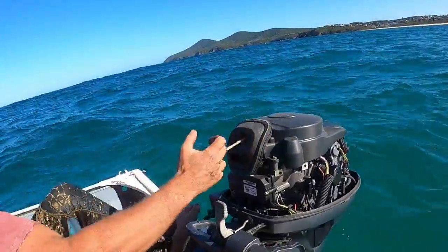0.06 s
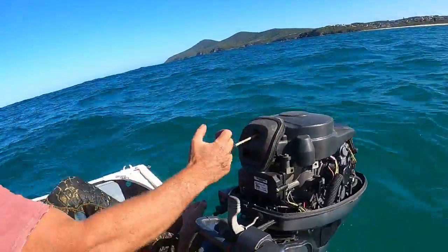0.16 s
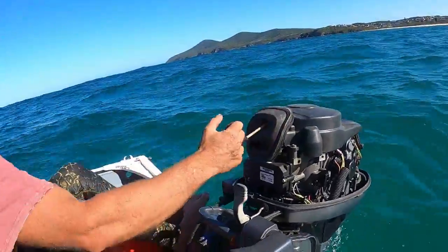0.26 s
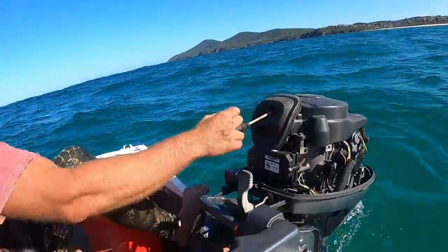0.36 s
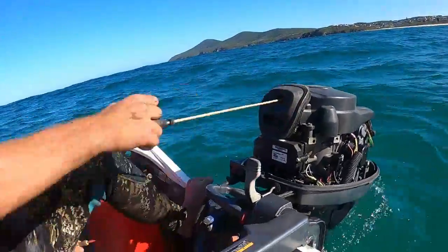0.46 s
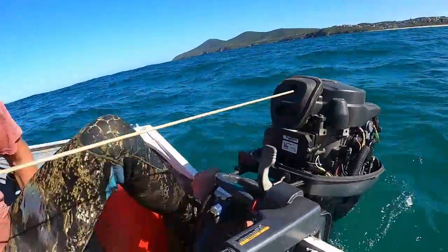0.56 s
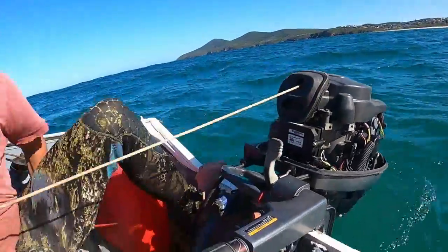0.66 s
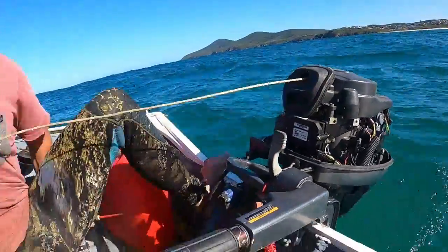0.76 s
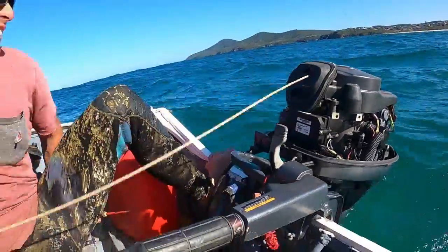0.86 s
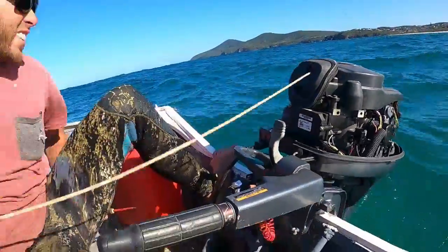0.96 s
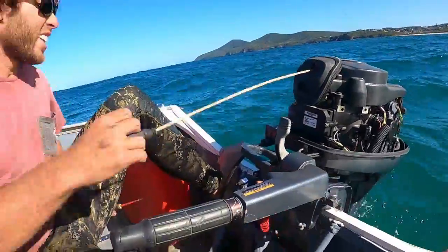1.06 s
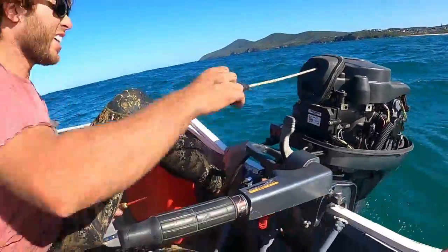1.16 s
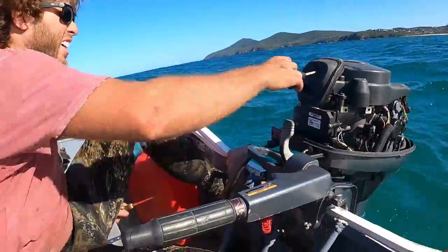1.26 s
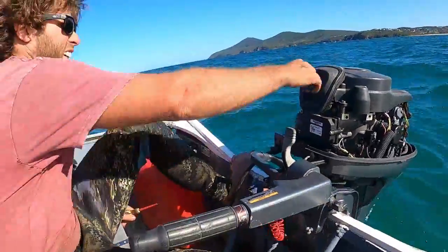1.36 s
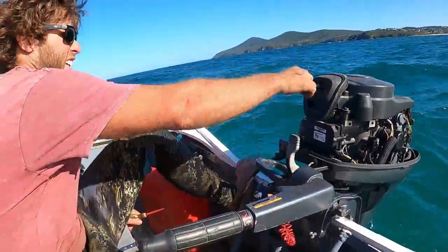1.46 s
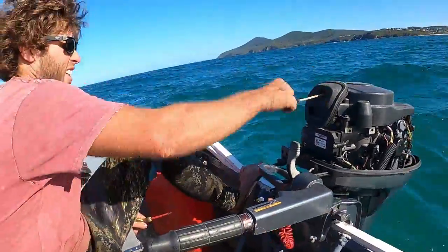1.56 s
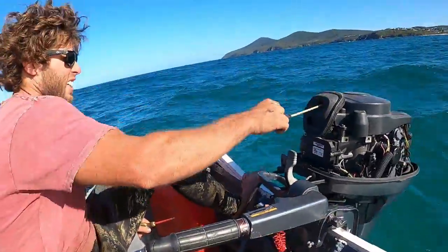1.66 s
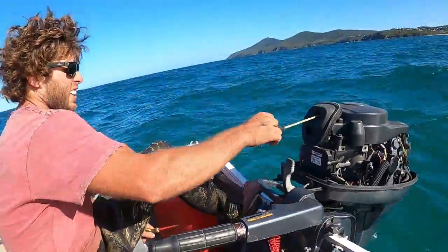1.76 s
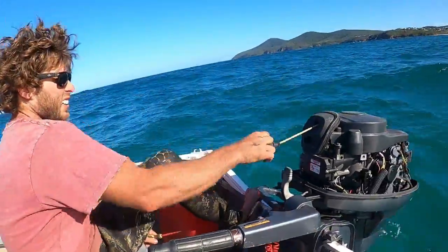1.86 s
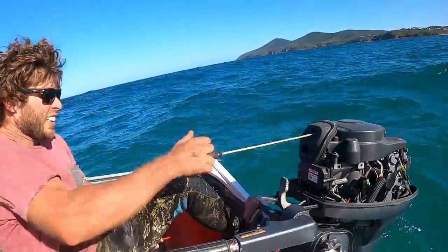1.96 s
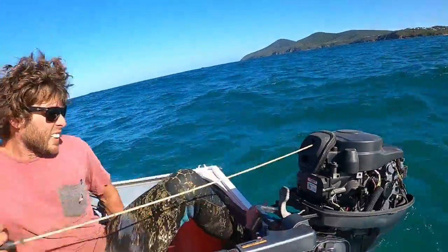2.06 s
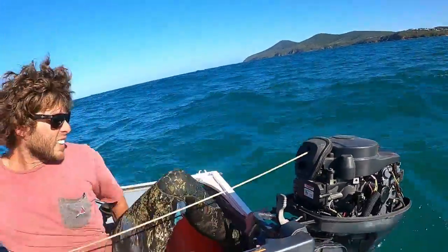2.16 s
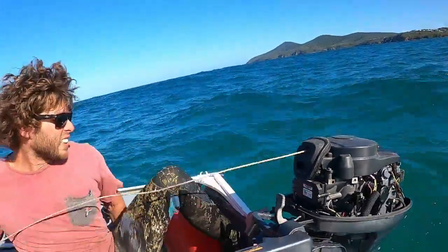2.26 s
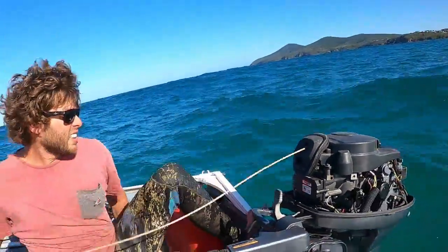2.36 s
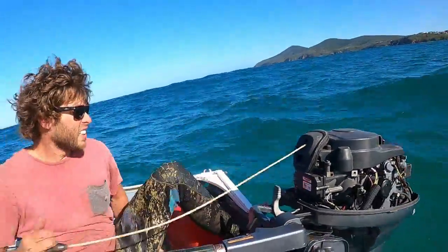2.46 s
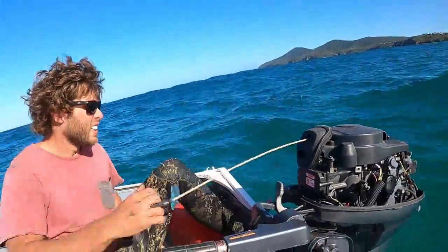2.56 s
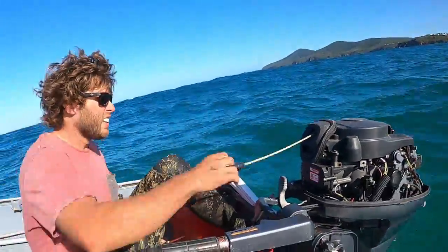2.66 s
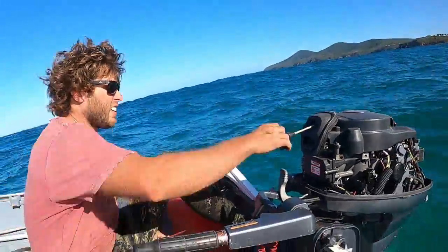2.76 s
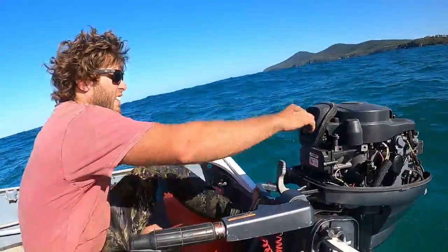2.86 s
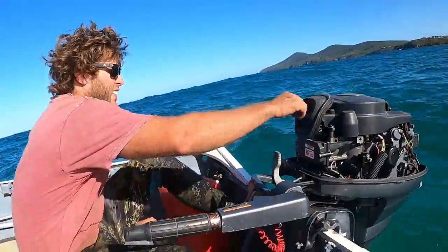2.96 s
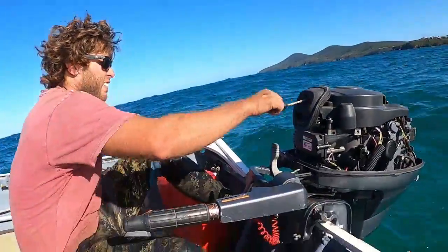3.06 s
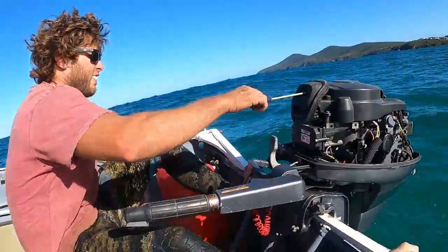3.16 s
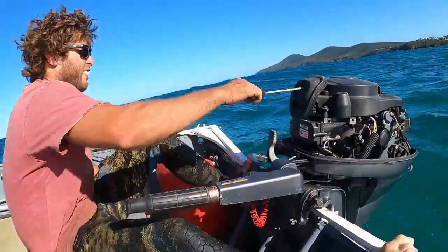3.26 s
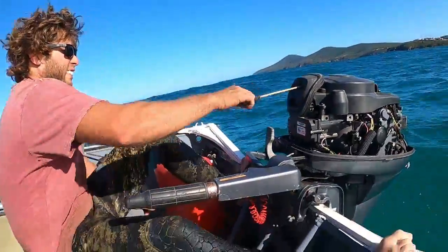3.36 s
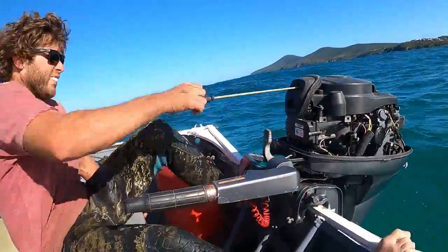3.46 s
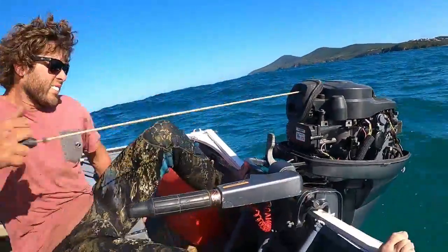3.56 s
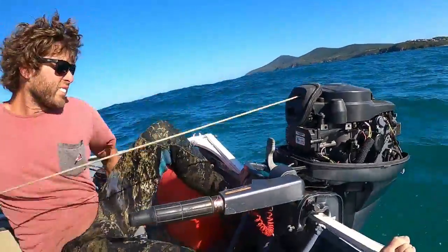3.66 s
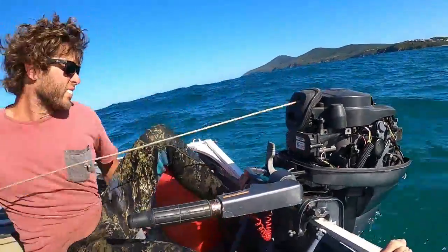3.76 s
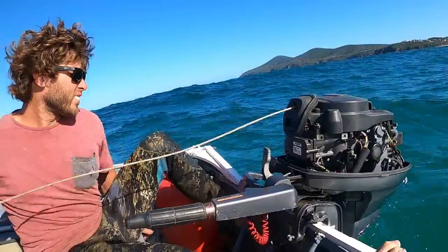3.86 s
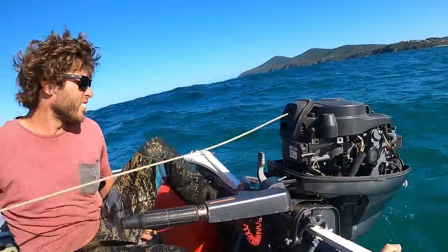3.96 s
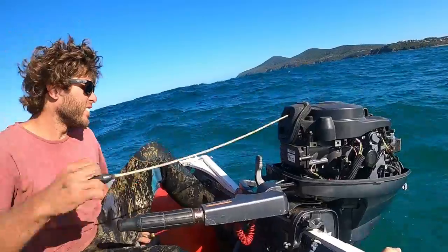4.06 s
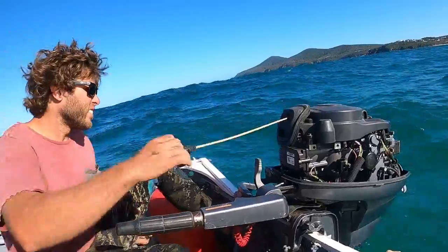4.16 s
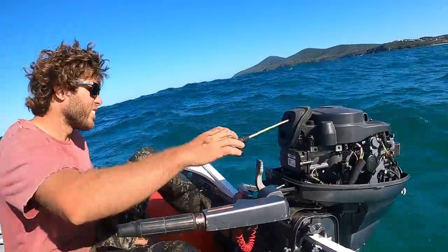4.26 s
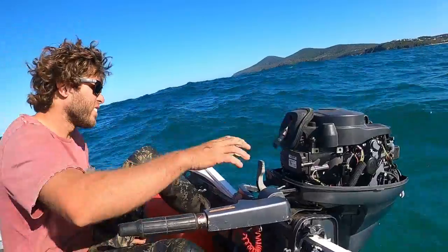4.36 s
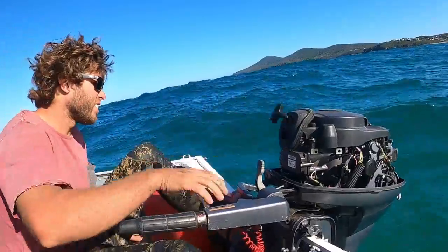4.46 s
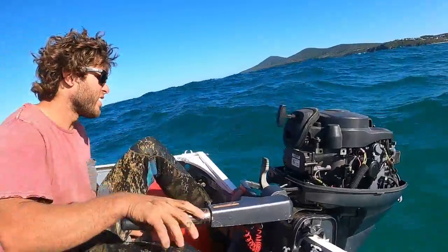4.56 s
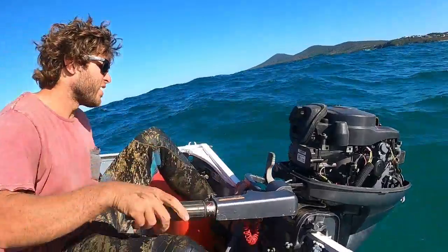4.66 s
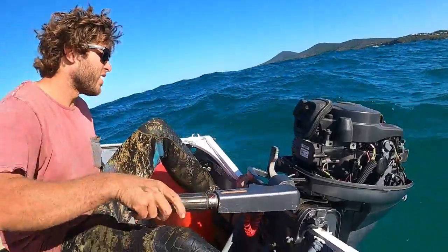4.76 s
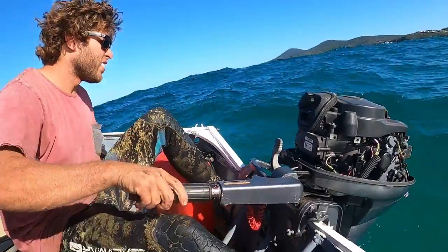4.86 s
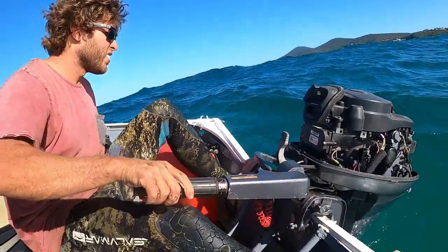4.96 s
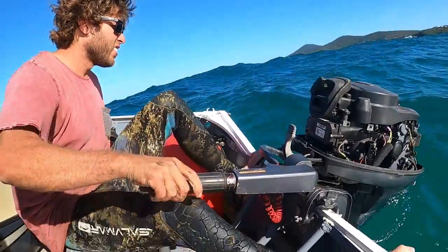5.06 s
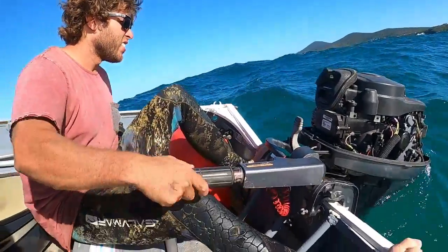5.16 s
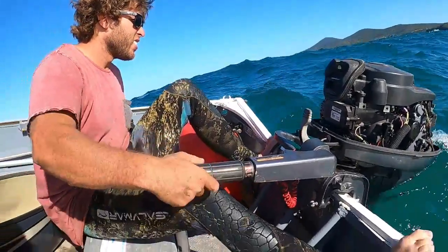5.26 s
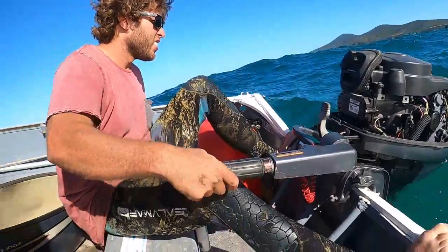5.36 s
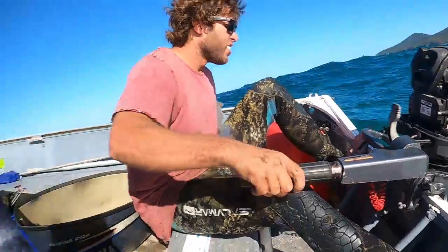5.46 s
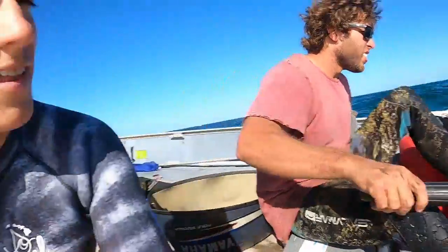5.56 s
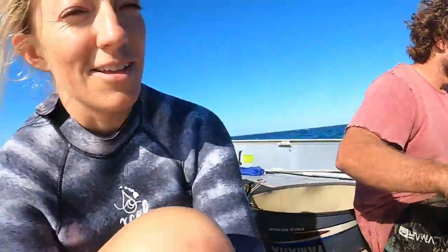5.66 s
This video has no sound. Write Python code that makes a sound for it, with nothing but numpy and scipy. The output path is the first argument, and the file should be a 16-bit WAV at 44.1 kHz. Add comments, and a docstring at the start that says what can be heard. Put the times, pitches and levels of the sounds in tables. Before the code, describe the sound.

Three harsh ratcheting starter-cord pulls, each followed by clacks and a faint rewind, with dull boat knocks, lapping water and low wind buffeting.

```python
"""Outboard motor that will not start

A small outboard on an open boat at sea is pulled over three times and never fires: filtered grains and
noise make a rasping rattle that surges either side of each compression. Pawls and tiller clack in short
noise bursts, the rope winds back in a noisy chatter and two high sines are the spring.
Decaying hull modes thump, clothing rubs close to the microphone, grains of water lap, rising sines gulp,
and low noise buffets the microphone.
"""
import sys
import numpy as np
from scipy import signal
from scipy.fft import rfft, irfft, next_fast_len
from scipy.io import wavfile
from scipy.ndimage import uniform_filter1d

SR = 44100
rng = np.random.default_rng(int(sys.argv[2]) if len(sys.argv) > 2 else 0)


def waveform_to_disk(signal):
    """Save audio, clipped to [-1, 1], as 16-bit WAV at the path in sys.argv[1]."""
    frames = np.transpose(np.atleast_2d(signal))
    scaled = np.clip(frames, -1, 1) * 32767
    samples = np.round(scaled).astype(np.int16)
    wavfile.write(sys.argv[1], SR, samples)


N = 251458
TIME = np.arange(N) / SR
GRID_HZ = np.fft.rfftfreq(4096, 1 / SR) + 1e-3

# pulls of the cord, each two surges with a compression between: t/s, take-up/s, first surge/s,
# compression/s, second surge/s, level/dB, dip at the compression/dB
CORD_PULLS = [(0.648, 0.0015, 0.084, 0.053, 0.05, -13, -13), (2.139, 0.017, 0.12, 0.035, 0.06, -19, -13),
              (3.655, 0.0075, 0.11, 0.091, 0.034, -13, -18)]
# starter and cowl resonances: f/Hz, width at -6 dB/Hz, level/dB
STARTER_MODES = [(442, 70, -12.5), (910, 190, -17), (1123, 140, 4), (1188, 134, -1.5), (1540, 180, -12),
                 (1664, 110, -9), (1907, 193, -10.5), (2430, 260, -18.5), (2843, 210, -13),
                 (3184, 280, -13.5), (3560, 350, -12), (3877, 190, -13.5), (4310, 210, -19),
                 (4954, 890, -21), (5690, 270, -28), (6410, 800, -32.5), (7440, 420, -39.5),
                 (10000, 5500, -62)]
# resonances of a dull knock carried to the microphone: f/Hz, width at -6 dB/Hz, level/dB
KNOCK_MODES = [(210, 400, 4.5), (397, 75, 5.5), (553, 137, 3.5), (1170, 216, 3.5), (1620, 280, -18),
               (3155, 260, -12.5), (5300, 900, -33)]


def from_db(db):
    """Decibels to gain."""
    return 10 ** (np.asarray(db) / 20)


def rms_one(x):
    """Scale to unit rms."""
    return x / np.sqrt(np.mean(x ** 2) + 1e-20)


def in_time(rows):
    """Join the rows of a curve by straight lines."""
    s, *columns = np.transpose(rows)
    return [np.interp(TIME, s, column) for column in columns]


def add(out, s, sound):
    """Mix a sound in at a time."""
    i = int(np.clip(s * SR, 0, N - 1))
    out[i:i + len(sound)] += sound[:N - i]


def drift(rate):
    """Bounded random wander with a spread near 1, taking a new target rate times a second."""
    return np.interp(TIME * rate, np.arange(4096), rng.uniform(-2, 2, 4096))


def coloured(x, spectrum):
    """Give a steady sound a spectrum; rms 1."""
    hz, db = np.transpose(spectrum)
    log_hz = np.log(np.fft.rfftfreq(N, 1 / SR) + 1e-3)
    gain = from_db(np.interp(log_hz, np.log(hz), db, left=-90, right=-90))
    return rms_one(irfft(rfft(x) * gain, N))


def ringing(resonances):
    """Causal (minimum-phase) impulse response of steep-sided resonances; energy 1."""
    power = sum(from_db(db) ** 2 / (1 + (2 * (GRID_HZ - hz) / width) ** 2) ** 2
                for hz, width, db in resonances)
    cepstrum = irfft(np.log(power) / 2)
    half = len(cepstrum) // 2
    response = irfft(np.exp(rfft(2 * cepstrum[:half], 2 * half)))[:half]
    return response / np.linalg.norm(response)


def through(x, response):
    """Play a sound through an impulse response."""
    return signal.fftconvolve(x, response)[:len(x)]


def grains(per_s, spread_db):
    """Random tiny impacts whose sizes spread by a number of dB; rms 1."""
    sizes = from_db(spread_db * np.minimum(rng.exponential(1, N), 4)) * rng.choice([-1, 1], N)
    return rms_one(sizes * (rng.random(N) < per_s / SR))


def stroke(s, length, rise, fall):
    """A force that builds, holds and dies away."""
    build = 1 - np.exp(-np.maximum(TIME - s, 0) / rise)
    return build * np.exp(-np.maximum(TIME - s - length, 0) / fall)


def band(x, low_hz, high_hz):
    """Causal band-pass."""
    edges = [low_hz, min(high_hz, .45 * SR)]
    return signal.sosfilt(signal.butter(2, edges, "band", fs=SR, output="sos"), x)


def effort(rise, fall, nudge_db=8, nudge_from=0.34, nudge_share=0.36):
    """Cord force builds as slack is taken up, sags, nudges the piston over compression and surges again."""
    out = np.zeros(N)
    for s, take_up, first, compression, second, db, dip_db in CORD_PULLS:
        first_surge = stroke(s, first, take_up + rise, fall)
        second_surge = stroke(s + first + compression, second, rise, fall)
        # start and length of the nudge are shares of the compression
        nudge = stroke(s + first + nudge_from * compression, nudge_share * compression, rise, fall)
        whole = stroke(s, first + compression + second, rise, fall)
        held = from_db(dip_db) * np.maximum(whole, from_db(nudge_db) * nudge)
        out += from_db(db) * np.maximum(first_surge + second_surge, held)
    return out


def releases():
    """The moments at which the arm lets the cord go back."""
    return [s + first + compression + second for s, _, first, compression, second, _, _ in CORD_PULLS]


def pulls(rattle_per_s=450, rasp_db=-3, judder_per_s=62, judder_db=2.0, coast_db=-24, coast_s=0.041,
          flywheel_db=-9, flywheel_width_hz=24):
    """Rope rasp and pawl rattle shake the starter, which judders, rings the flywheel and coasts briefly."""
    # thin metal modes of the flywheel: f/Hz, level/dB
    flywheel_modes = [(1066, -25.5), (1308, -35.5), (1663, -39.5), (1922, -39.5), (2880, -43.5),
                      (3133, -47), (3300, -41), (3526, -42), (4274, -46.5), (4947, -47.5)]
    rasp = from_db(rasp_db) * rng.standard_normal(N)
    shaking = through(grains(rattle_per_s, spread_db=0) + rasp, ringing(STARTER_MODES))
    # the arm keeps the force even: level it over about 16 ms
    shaking = shaking / np.sqrt(uniform_filter1d(shaking ** 2, size=700) + 1e-9)
    treble = signal.sosfiltfilt(signal.butter(2, 2200, "high", fs=SR, output="sos"), shaking)
    judder = np.cos(2 * np.pi * np.cumsum(judder_per_s * (1 + 0.13 * drift(25))) / SR)
    body = (shaking - treble) * from_db(judder_db * judder)
    # the treble of the rasp flickers at random
    treble = treble * from_db(2.4 * drift(260))
    coast = from_db(coast_db) * sum(stroke(s, 0, rise=0.0097, fall=coast_s) for s in releases())
    bite = effort(rise=0.0019, fall=0.011)
    metal = ringing([(hz, flywheel_width_hz, db) for hz, db in flywheel_modes])
    flywheel = through(bite * rng.standard_normal(N), metal)
    body_force = effort(rise=.009, fall=.011) + coast
    return body_force * body + bite * treble + from_db(flywheel_db) * flywheel


def clacks(table, resonances, low_db, mid_db, upper_db, treble_db, tail_db, tail_s, chatter_s,
           low_follows, graze=0.39):
    """Each contact grazes, bites and chatters on a resonant body; its lows follow its strength."""
    out, body = np.zeros(N), ringing(resonances)
    t = TIME[:6000] - .012   # room for the graze ahead of the contact
    age = t / max(chatter_s, 1e-3)
    bite = (1 + np.tanh(age / (2 * graze))) / 2
    dying = np.exp(-np.maximum(age, 0)) + from_db(tail_db) * np.exp(-np.maximum(t, 0) / tail_s)
    for s, db, bright_db in table:
        ring = through(rng.choice([-1, 1], len(t)) * bite * dying, body)
        bands = [(330, 664, low_follows * db + low_db),
                 (770, 1196, db + mid_db),
                 (1740, 2000, db + bright_db + upper_db),
                 (2700, 22000, db + bright_db + treble_db)]
        for low_hz, high_hz, level in bands:
            part = band(ring, low_hz, high_hz)
            # same energy as 18 ms at the given level
            add(out, s + t[0], from_db(level) * part / np.linalg.norm(part) * np.sqrt(0.018 * SR))
    return out


def pawl_clacks():
    """The pawls and rope drum strike the starter, exciting its resonances."""
    # clacks of the pawls and rope drum: t/s, relative level/dB, relative brightness/dB
    contacts = [(0.0074, -24.5, -24), (0.0596, -23, -19.5), (0.0872, 1.5, -40), (0.15, -21, -26.5),
                (0.161, -18.5, -25), (0.2765, -28.5, -24), (0.406, -21.5, -23.5), (0.5746, -17.5, -21.5),
                (0.5937, -17.5, -20.5), (0.6075, -19.5, -19), (0.632, -21.5, -14), (0.843, 1.5, -31),
                (0.9267, -12.5, -26), (1.0052, -18, -26.5), (1.3928, -27.5, -18), (1.4945, -20.5, -17),
                (1.507, -23.5, -33), (1.7487, -3, -38.5), (2.0865, -36, -13), (2.197, -5, -26),
                (2.2655, -3, -30), (2.3152, -8, -22), (2.4408, -13, -27.5), (3.1895, -31.5, -12.5),
                (3.2232, -7.5, -29), (3.257, -19.5, -18), (3.2735, 0.5, -31.5), (3.5799, -26, -13),
                (3.6356, -28.5, -12.5), (3.847, -3, -23), (3.9664, -17.5, -24), (4.175, -32.5, -16)]
    return clacks(contacts, STARTER_MODES, low_db=-29, mid_db=-11.5, upper_db=1.0, treble_db=1.0,
                  tail_db=-18.0, tail_s=0.014, chatter_s=0.004, low_follows=0.73)


def tiller_knocks():
    """The handle and tiller knock, with a longer tail than the pawls."""
    # knocks of the handle and tiller: t/s, relative level/dB, relative brightness/dB
    contacts = [(3.225, -13, -23.5), (3.279, -7, -29.5), (4.5146, -10.5, -25), (4.5777, -24, -18.5),
                (4.6363, -24, -22), (4.7691, -13, -25.5), (4.8367, -25, -16), (4.994, -36.5, -7.5),
                (5.254, -16, -22.5), (5.2704, -24, -17), (5.3286, -28.5, -16), (5.4525, -29.5, -31)]
    # resonances of the cowl and tiller: f/Hz, width at -6 dB/Hz, level/dB
    tiller_modes = [(408, 250, -5), (489, 82, 2), (792, 73, -14), (967, 130, -4), (1216, 176, 2.5),
                    (1630, 120, -31.5), (1890, 210, -28), (2670, 330, -20), (3350, 930, -19),
                    (4500, 300, -39), (5360, 1050, -27.5), (6420, 1000, -35)]
    return clacks(contacts, tiller_modes, low_db=-13.5, mid_db=-10.5, upper_db=0.5, treble_db=-2.5,
                  tail_db=-16, tail_s=0.03, chatter_s=0.0041, low_follows=1.54)


def rewinds(ticks_per_s=68, wobble=0.2165, treble_db=2):
    """The spring spins the drum back and the pawls skip over their ratchet: pulsed noise in the starter."""
    # two flutters of the drum after every pull: t after letting go/s, length/s, level/dB
    flutters = [(0.126, 0.062, -37), (0.265, 0.14, -42)]
    turns = np.cumsum(ticks_per_s * (1 + wobble * drift(30))) / SR
    skips = from_db(6.6 * np.cos(2 * np.pi * turns) + 0.94 * drift(70)) * rng.standard_normal(N)
    chatter = through(skips, ringing(STARTER_MODES))
    chatter = rms_one(chatter + from_db(treble_db) * band(chatter, 870, 3920))
    flutter = sum(from_db(db) * stroke(s + wait, length, rise=.006, fall=0.0052)
                  for s in releases() for wait, length, db in flutters)
    return chatter * flutter


def spring(level_db=-52.5, t60=1.0):
    """The recoil spring rings on thinly after each pull, wavering in level and phase."""
    # recoil spring tones: f/Hz, mean level/dB
    tones = [(5230, -5), (5780, -6)]
    swing = from_db(level_db) * sum(stroke(s, 0, rise=.01, fall=t60 / np.log(1000)) for s in releases())
    return swing * sum(from_db(db + drift(27)) * np.sin(2 * np.pi * hz * TIME + drift(24))
                       for hz, db in tones)


def rope(rustle_db, level_db=-3.0, running_db=-11):
    """Rope and sleeves rustle as the arm moves; the rope hisses in its guide while it is pulled."""
    # colour of the rope and sleeves: f/Hz, level/dB
    rope_colour = [(880, -27), (1500, -2), (1770, -10.5), (1920, -9.5), (2050, -20), (2240, -16),
                   (3820, -15), (4240, -32), (4600, -29.5), (5400, -15.5), (6030, -30.5), (6500, -30),
                   (6970, -31.5), (7840, -45), (10200, -72), (17200, -120)]
    fibres = (grains(300, spread_db=3) + .9 * rng.standard_normal(N)) * from_db(2 * drift(60))
    running = from_db(running_db) * effort(rise=0.011, fall=0.0049)
    sliding = from_db(rustle_db + level_db) + running
    return sliding * coloured(fibres, rope_colour)


def ticks(rustle_db, per_s=22, level_db=-2, chatter_s=.003):
    """Loose parts of the starter tick faintly in short noise bursts that follow the rustle."""
    chatter = np.exp(-TIME[:1000] / chatter_s)
    touches = through(np.abs(grains(per_s, spread_db=3.5)), chatter) * rng.standard_normal(N)
    ticking = band(through(touches, ringing(STARTER_MODES)), 1300, 9000)
    return from_db(rustle_db + level_db) * rms_one(ticking)


def thumps(boom_db=2.0, knock_db=-9):
    """Feet and knees push the hull into a boom of decaying modes, with a dull noise-burst knock."""
    # thumps on the hull: t/s, relative boom/dB, contact/s, relative knock/dB
    contacts = [(0.573, -16, 0.036, -47.5), (1.497, -1, 0.0083, -5.5), (1.626, -12.5, 0.0055, -50.5),
                (1.732, -1.5, 0.006, -4), (1.743, -3.5, 0.013, -1), (1.775, -7, 0.003, -8.5),
                (2.043, -12.5, 0.014, -32.5), (2.144, -4.5, 0.011, -21), (2.446, -12, 0.0025, -17),
                (2.773, -16.5, 0.0056, -31), (5.604, -6.5, 0.013, 1.5), (5.663, -12.5, 0.0039, -1.5),
                (5.68, -5.5, 0.0022, -11)]
    # hull modes: f/Hz, level/dB, t60/s
    hull_modes = [(53, -7, 0.1), (98, -13.5, 0.18), (107, 0, 0.23), (128, -18, 0.37), (154, -23.5, 0.075),
                  (228, -27.5, 0.026)]
    out, t, body = np.zeros(N), TIME[:16000], ringing(KNOCK_MODES)
    hull = sum(from_db(db - 60 * t / t60) * np.cos(2 * np.pi * hz * t) for hz, db, t60 in hull_modes)
    for s, db, contact_s, hard_db in contacts:
        age = 4 * t / contact_s   # the push peaks halfway through the contact
        boom = through(age ** 2 * np.exp(-age), hull)
        add(out, s, -from_db(db + boom_db) * boom / np.abs(boom).max())
        knock = through(rng.standard_normal(len(t)) * np.exp(-t / 0.0068), body)
        # same energy as 7.2 ms at the given level
        add(out, s, from_db(hard_db + knock_db) * knock / np.linalg.norm(knock) * np.sqrt(0.0072 * SR))
    return out


def scuffs(hiss_db=-16, rumble_db=1):
    """Clothing rubs close to the microphone: sticking and slipping grains, a thin hiss and a low rumble."""
    # clothing rubbing close to the microphone: t/s, length/s, relative level/dB
    rubs = [(1.63, 0.089, -30), (1.718, 0.057, -24.5), (5.618, 0.1, -22.5), (5.681, .05, -14)]
    pressure = sum(from_db(db) * stroke(s, length, rise=0.0038, fall=0.0029) for s, length, db in rubs)
    slips = grains(1500, spread_db=3)
    hiss = from_db(hiss_db) * rms_one(band(slips, 2700, 3600))
    rumble = from_db(rumble_db) * rms_one(band(slips, 75, 150))
    return pressure * (through(slips, ringing(KNOCK_MODES)) + hiss + rumble)


def gulps(swell_s=0.006, rise_per_s=2.0):
    """Trapped pockets of air ring briefly and rise in pitch."""
    # gulps of water under the hull: t/s, starting f/Hz, level/dB
    pockets = [(0.03, 309, -34), (1.002, 201, -28), (1.922, 173, -37), (3.138, 162, -33),
               (3.597, 191, -29.5), (4.455, 223, -36), (5.275, 270, -32), (5.336, 265, -31.5)]
    out, t = np.zeros(N), TIME[:6000]
    swell = t / swell_s * np.exp(1 - t / swell_s)
    for s, hz, db in pockets:
        cycles = hz * (t + rise_per_s * t ** 2 / 2)
        add(out, s, from_db(db) * swell * np.sin(2 * np.pi * cycles))
    return out


def sea(lapping_db, level_db=-1, patchy_db=4):
    """Small waves splash along the hull: coloured drops and noise of wandering level."""
    # colour of the lapping: f/Hz, level/dB
    sea_colour = [(150, -2.5), (300, -24), (480, -6), (700, -19), (900, -10), (1130, 2.5), (1300, -1),
                  (1550, -15.5), (1900, -16.5), (2300, -34.5), (3400, -23), (6000, -35.5), (9000, -54)]
    drops = grains(1300, spread_db=3.0) + 1.03 * rng.standard_normal(N)
    return from_db(lapping_db + level_db + patchy_db * drift(25)) * coloured(drops, sea_colour)


def wind(level_db=4, lumpy_db=3, apart_db=-26):
    """Eddies press on the microphone as low noise, almost alike in both channels."""
    # strength of the wind: t/s, relative level/dB
    strength = [(0.0, -27.5), (0.71, -35.5), (0.92, -35), (1.2, -39.5), (1.66, -24.5), (1.79, -37),
                (2.75, -41), (2.94, -35), (3.11, -35.5), (4.57, -41.5), (5.44, -40.5), (5.68, -23)]
    # colour of the wind: f/Hz, level/dB
    wind_colour = [(12, 7), (22, -3), (45, -2.5), (105, -8.5), (160, -19.5), (230, -24), (400, -32.5),
                   (700, -44)]
    wind_db, = in_time(strength)
    shared, apart = [coloured(rng.standard_normal(N), wind_colour) for _ in range(2)]
    gusts = from_db(wind_db + level_db + lumpy_db * drift(14))
    return gusts * (shared + from_db(apart_db) * apart * [[1], [-1]])


def boat(x, echo_db=-15, t60=0.058, apart_db=-13, treble_apart_db=-9):
    """Short reflections off the open hull, which differ between the sides most in the treble."""
    t = TIME[:8000]
    fading = from_db(-60 * t / t60) * (t > .004)   # the first reflection comes after 4 ms
    shared, side = rng.standard_normal((2, len(t))) * fading / np.linalg.norm(fading)
    apart = through(x, side)
    apart = from_db(apart_db) * apart / 2 + from_db(treble_apart_db) * band(apart, 3200, 7700) / 2
    return x + from_db(echo_db) * through(x, shared) + apart * [[1], [-1]]


def panels(x, apart_db=-18, t60=.03):
    """The hull's panels pass knocks to the two sides unequally; the boom stays nearly alike."""
    t = TIME[:3000]
    response = rng.standard_normal(len(t)) * from_db(-60 * t / t60)
    knocks = band(band(x, 230, 5000), 230, 5000)
    apart = through(knocks, response / np.linalg.norm(response))
    return x + from_db(apart_db) * apart * [[1], [-1]]


def ports(pair):
    """The two microphone ports differ in phase and level by amounts that depend on frequency."""
    # the two microphone ports: f/Hz, lag of the left/rad, left-right level/dB
    differences = [(100, 0, 0.24), (300, 0, -0.8), (550, 0, 1.6), (1110, 0, 1), (2260, 0.8, 1.5),
                   (3540, 0.014, 2), (5600, 1.58, -3), (6600, 0.58, 0.6), (12000, 0.65, 1)]
    hz, lag, db = np.transpose(differences)
    size = 2 * next_fast_len(N // 2 + 4096)
    bins = np.fft.rfftfreq(size, 1 / SR)
    # the left takes half the difference, the right its inverse
    half = from_db(np.interp(bins, hz, db) / 2) * np.exp(-.5j * np.interp(bins, hz, lag))
    return irfft(rfft(pair, size) * np.array([half, 1 / half]), size)[:, :N]


def scene():
    """Airborne sounds pick up the boat's reflections; thumps and scuffs spread unequally to the sides."""
    # background between the pulls, one stretch each: t/s, relative lapping/dB, relative sleeve rustle/dB
    background = [
        [(0.03, -41.5, -57), (0.11, -44.5, -70), (0.202, -41.5, -60), (0.388, -42.5, -60), (0.54, -44, -56.5)],
        [(1.05, -41, -53), (1.244, -45, -56), (1.656, -40.5, -48), (1.804, -55, -63), (2.04, -50, -76)],
        [(2.58, -42, -55), (2.73, -47, -69), (2.972, -47, -55), (3.478, -52, -59), (3.56, -44.5, -56)],
        [(4.08, -43, -67.5), (4.294, -47, -70), (5.068, -46.5, -56.5), (5.192, -44.5, -50.5),
         (5.56, -43.5, -51.5)],
    ]
    lapping_db, rustle_db = in_time(np.vstack(background))
    starter = pulls() + pawl_clacks() + tiller_knocks() + rewinds() + spring()
    airborne = starter + rope(rustle_db) + ticks(rustle_db) + sea(lapping_db)
    bumps = panels(thumps() + scuffs())
    return ports(boat(airborne) + bumps + gulps() + wind())


def record(dry):
    """The loudest peaks are rounded and the top is cut."""
    rounded = dry / (1 + dry ** 6) ** (1 / 6)
    # stopband 70 dB down from 15.7 kHz
    return signal.sosfilt(signal.cheby2(12, 70, 15700, fs=SR, output="sos"), rounded)


dry = scene()
out = record(dry)
waveform_to_disk(out)
```